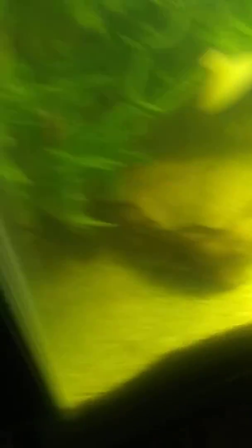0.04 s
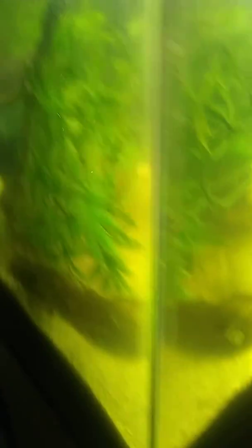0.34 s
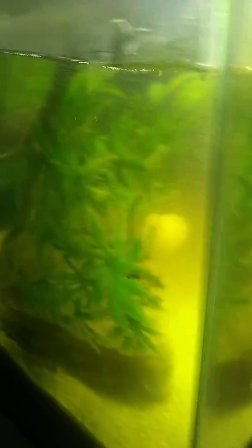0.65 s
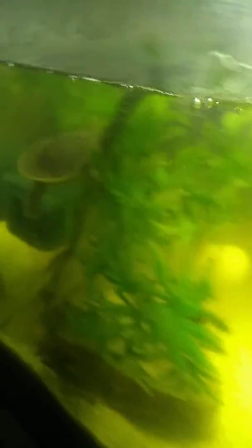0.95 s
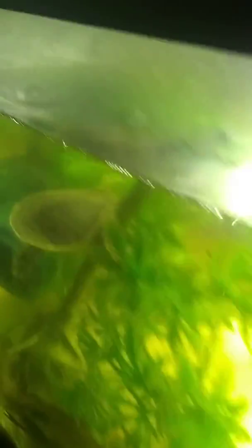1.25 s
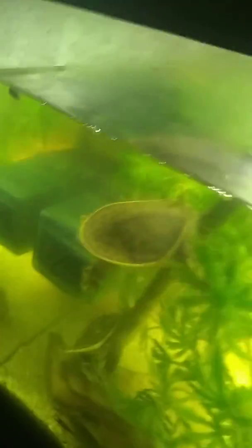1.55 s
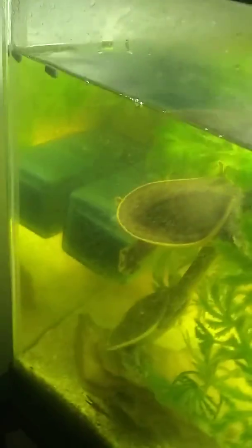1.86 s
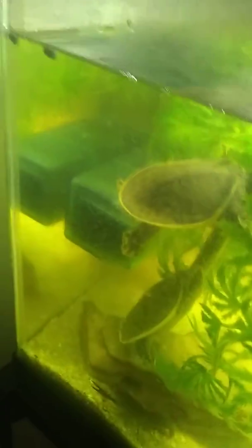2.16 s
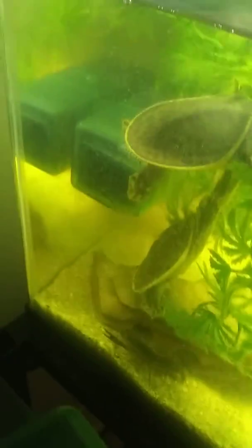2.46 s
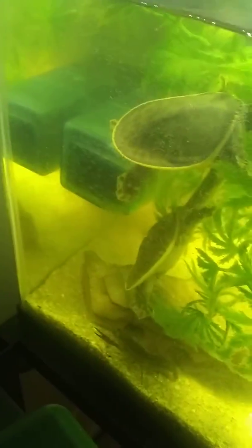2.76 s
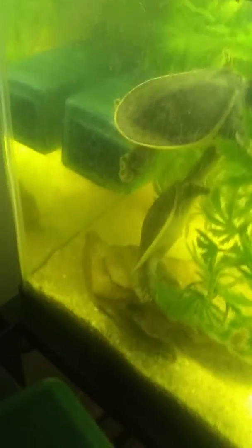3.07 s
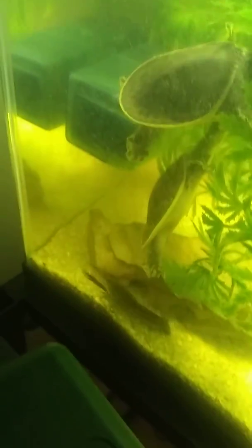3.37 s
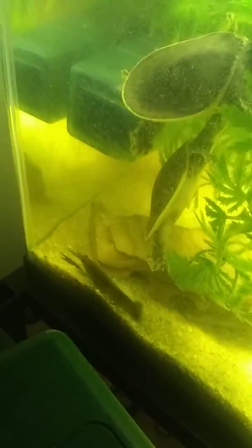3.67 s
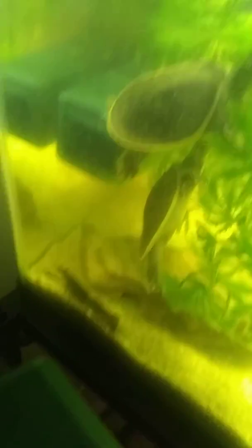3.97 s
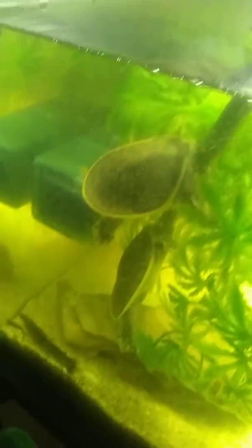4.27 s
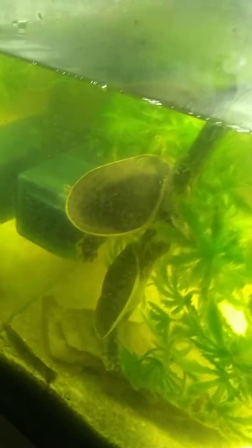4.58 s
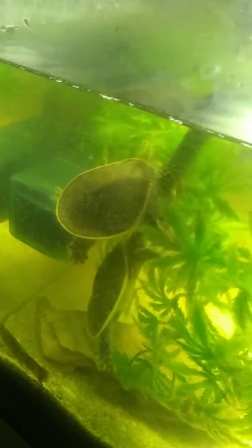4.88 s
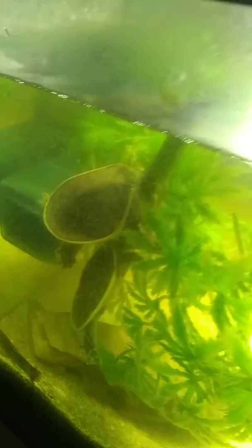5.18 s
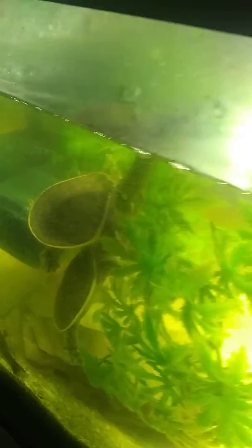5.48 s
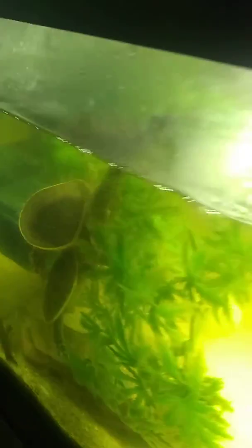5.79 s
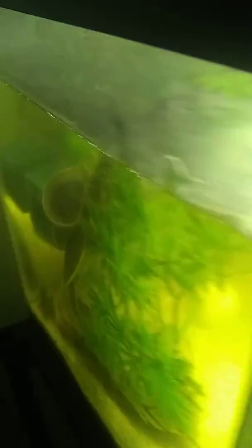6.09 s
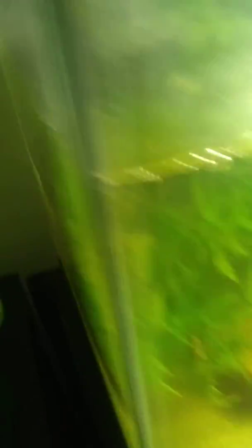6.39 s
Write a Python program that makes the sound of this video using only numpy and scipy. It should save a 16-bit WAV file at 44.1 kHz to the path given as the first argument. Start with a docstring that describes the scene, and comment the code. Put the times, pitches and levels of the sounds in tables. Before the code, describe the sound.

Water trickles and plinks from an aquarium filter over a low steady pump hum, with brief handling rustle and bumps at first.

```python
"""A pump hums in a small room and a sleeve rustles, while an aquarium filter trickles into its tank.
Each splash traps a bubble that resonates briefly under the lid; spray ticks and fizzes above a soft,
surging rush, and air gulps in the filter's housing. The rustle comes from a hand-held camera with two
cross-fed microphone ports, which swings round the corner of the tank and is bumped a few times."""
import sys
import numpy as np
from scipy import signal
from scipy.fft import rfft, irfft
from scipy.io import wavfile

SR = 44100
rng = np.random.default_rng(int(sys.argv[2]) if len(sys.argv) > 2 else 0)


def store_pcm(level_fs):
    """Save levels as 16-bit WAV."""
    pcm = np.round(np.clip(level_fs, -1, 1) * 32767).astype(np.int16)
    wavfile.write(sys.argv[1], SR, np.atleast_2d(pcm).T)


N = 283946
TIME, FREQ = np.arange(N) / SR, np.fft.rfftfreq(N, 1 / SR)


def gain_of(db):
    """Amplitude ratio of a level in decibels."""
    return 10 ** (np.asarray(db) / 20)


def unit_rms(x):
    """Normalisation to a mean power of 1."""
    return x / np.sqrt(np.mean(x ** 2) + 1e-20)


def value_at(points, hz):
    """Interpolation of (frequency, value) points on a logarithmic frequency axis."""
    point_hz, value = np.transpose(points)
    return np.interp(np.log(hz + 1), np.log(point_hz + 1), value)


def envelope(curve):
    """Amplitude envelope through (time_s, level_db) points."""
    return gain_of(np.interp(TIME, *np.transpose(curve)))


def coloured(x, db):
    """Spectral shaping by a gain in dB at every frequency, scaled to rms 1."""
    return unit_rms(irfft(rfft(x) * gain_of(db), N))


def wander(corner_hz):
    """Random fluctuation of rms 1, falling 12 dB an octave above the corner."""
    return coloured(rng.standard_normal(N), -40 * np.log10(1 + FREQ / corner_hz))


def add(mix, start_s, sound):
    """Superposition of a sound on both channels of the mix."""
    part = mix[:, max(round(start_s * SR), 0):][:, :sound.shape[1]]
    part += sound[:, :part.shape[1]]


def scatter(sound, glass=1.3, fade_s=0.0095, left_lag_samples=14):
    """Direct sound and early reflections off the glass, scaled to the energy of 10 ms at rms 1."""
    t = np.arange(1500) / SR
    taps = rng.standard_normal((2, len(t))) * (rng.random((2, len(t))) < .08) * np.exp(-t / fade_s)
    taps *= glass / np.linalg.norm(taps, axis=1, keepdims=True)
    taps[0, left_lag_samples] += 1
    taps[1, 0] += 1
    out = signal.fftconvolve(sound[None], taps, axes=1)
    return out / np.sqrt((out ** 2).mean(0).sum() / (SR / 100))


def room(x, wet_db):
    """Reverberation: a diffuse tail, longest in the bass and different for every source position."""
    # reverberation time of the room: frequency_hz, t60_s
    decay_times = [(300, 1), (1500, 0.2), (4000, 0.22), (8000, 0.14), (14000, 0.29)]
    hz, t, spectra = signal.stft(rng.standard_normal((2, SR // 3)), SR, nperseg=256)
    spectra = spectra * gain_of(-60 * t / value_at(decay_times, hz)[:, None]) * np.minimum(t / 0.0016, 1)
    response = signal.istft(spectra, SR, nperseg=256)[1]
    response *= gain_of(wet_db) / np.linalg.norm(response[0])
    response[:, 0] += 1  # the direct sound
    return signal.oaconvolve(x, response, axes=1)[:, :N]


def diffuse_noise(colour):
    """A diffuse field: steady noise that is only partly coherent between the two ports."""
    # how much the ports differ: frequency_hz, side_over_mid_db
    widths = [(30, 8), (60, 4.5), (100, 0.5), (135, -11), (165, -7.5), (200, 1.5), (240, -5.5), (320, -2.5),
              (500, -6.5), (800, -5), (1150, -96), (2300, 24), (3400, -36), (4600, 52), (5700, -1)]
    mid, side = rfft(rng.standard_normal((2, N)))
    width = gain_of(value_at(widths, FREQ))
    pair = np.array([mid + width * side, mid - width * side]) / np.sqrt(1 + width ** 2)
    return coloured(irfft(pair, N), value_at(colour, FREQ))


def pump(waver_rad=0.39):
    """Pump hum, with two faint wavering resonances above it, over the rumble of churned water."""
    # spectrum of the rumble in the housing: frequency_hz, density_db
    colour = [(22, -33), (33, -16), (55, -9), (75, -11.5), (112, -13.5), (135, -2.5), (163, 1), (190, -3.5),
              (206, -9.5), (219, -3.5), (246, -10), (263, -3), (281, -10.5), (450, -24.5), (900, -52)]
    # pump hum and, in the last two rows, the resonances: pitch_hz, rms_db, port_phase_rad
    hum_and_resonances = [(100, -67.5, 1.5), (120, -57.3, 2.2), (161.5, -57, .5), (179, -62, .5),
                          (240, -61, 1.0), (300, -70, .5), (360, -70, .5), (546, -70.5, .5), (636, -72, .4),
                          (840, -76, .2)]
    out = gain_of(-47.5) * diffuse_noise(colour) * gain_of([[.8], [-.8]])
    for hz, db, port_phase in hum_and_resonances:
        phase = 2 * np.pi * hz * TIME + waver_rad * wander(corner_hz=0.61)
        out += np.sqrt(2) * gain_of(db) * np.sin(phase + np.array([[port_phase], [0]]))
    return out


def room_air(level_db=-52.5):
    """Ambient noise: a faint, low, diffuse background."""
    # spectrum of the background: frequency_hz, density_db
    colour = [(100, -19), (250, -2.5), (380, 3), (415, -4), (490, -0.5), (610, -5.5), (645, -1), (720, -7),
              (870, -9), (1000, -24), (1500, -29), (4000, -42)]
    return gain_of(level_db) * diffuse_noise(colour)


def rustle(slip_db=0.5, drag_db=1.87):
    """Friction noise: cloth and skin slide unevenly near the ports, in fine slips and longer drags."""
    # rubbing of sleeve and hand as the camera swings round: time_s, level_db
    levels = [(0, -47), (.22, -43), (.45, -47), (.62, -41.5), (.8, -51), (.9, -52), (1.05, -64),
              (1.3, -100)]
    # spectrum of the rubbing: frequency_hz, density_db
    colour = [(70, -20), (170, -10), (390, 9), (600, -6), (1000, -6.5), (2100, -3.5), (2400, -0.5),
              (2900, -14), (3450, 2), (3950, -5), (4600, -17), (5800, -7.5), (6900, -25), (7800, -7.5),
              (8700, -22.5), (10300, -3), (11200, -18), (12400, -4.5), (14000, -25)]
    unevenness = gain_of(slip_db * wander(corner_hz=90) + drag_db * wander(corner_hz=14))
    return envelope(levels) * unevenness * diffuse_noise(colour)


def bubble(hz, cycles, glide, burst_hz=4500, samples=1800):
    """A damped oscillator whose pitch climbs as it nears the surface; above burst_hz it bursts early."""
    t = np.arange(samples) / SR
    decay_s = cycles / hz * (hz / 3000) ** 0.26 / np.sqrt(1 + (hz / burst_hz) ** 6)
    decay = np.exp(-t / decay_s)
    attack = 1 - np.exp(-t / (0.091 * decay_s))
    turns = hz * (t + glide * (t - decay_s * (1 - decay))) / (1 + glide / 2)
    return np.sin(2 * np.pi * turns) * decay * attack


def swarm(per_s, spread_db, low_hz, high_hz, cycles, spots, wet_db=3.5):
    """Incoherent sum of small bubbles of random moment, pitch and strength at several surface spots."""
    out, impulse = np.zeros((2, N)), np.ones(1)
    per_spot = int(per_s * N / SR / spots)
    for _ in range(spots):
        bubbles = np.zeros((1, N))
        for moment, pitch, strength in rng.random((3000, 4))[:per_spot, :3]:
            hz = low_hz + (high_hz - low_hz) * pitch ** 1.5  # low bubbles are the more common
            amplitude = gain_of(spread_db * min(-np.log(1 - strength), 3)) * (hz / high_hz) ** 0.82
            ring = bubble(hz, cycles, glide=0.014, burst_hz=8100, samples=400)
            add(bubbles, moment * N / SR, amplitude * ring[None])
        out += room(signal.oaconvolve(bubbles, scatter(impulse), axes=1)[:, :N], wet_db)
    return out


def stream():
    """The falling sheet of water: heavily damped splashes overlap into a broadband rush."""
    # course of the rush: time_s, relative_db
    levels = [(0, -56), (.5, -58), (.63, -53), (.85, -56), (1.08, -63), (1.3, -51.5), (1.62, -52),
              (1.85, -62), (3.75, -62), (4.0, -55), (4.48, -62), (5.5, -62), (5.85, -58), (6.44, -58.5)]
    # shaping of its spectrum: frequency_hz, gain_db
    colour = [(300, 15.5), (700, -7), (1000, 6), (1500, 5), (2200, 4.5), (2700, 6), (3400, 3.5),
              (4600, -20), (7000, 4), (10300, -1.5), (12000, -2.5), (14000, 1)]
    splashes = swarm(per_s=1500, spread_db=3.5, low_hz=487, high_hz=14000, cycles=2.72, spots=6)
    return gain_of(7.0) * envelope(levels) * coloured(splashes, value_at(colour, FREQ))


def froth():
    """Tiny bubbles resonate and burst where the stream enters, merging into a fizz."""
    # course of the fizz: time_s, relative_db
    levels = [(0, -66), (.65, -52), (.85, -54.5), (1.05, -57.5), (1.3, -55.5), (1.65, -53.5), (2.1, -56.5),
              (2.7, -55.5), (3.6, -56.5), (3.95, -60), (4.3, -55.5), (5.7, -55), (6.44, -59.5)]
    # shaping of its spectrum: frequency_hz, gain_db
    colour = [(900, 17), (1500, -15), (2200, -48), (3200, 2), (4200, 5), (4900, 3.5), (6000, 3),
              (8000, 2.5), (10300, 4), (11500, -1), (14000, 6.5)]
    bubbles = swarm(per_s=750, spread_db=7.0, low_hz=1332, high_hz=14110, cycles=7.1, spots=10)
    return gain_of(4.0) * envelope(levels) * coloured(bubbles, value_at(colour, FREQ))


def surge(corner_hz=4.9, depth_db=1.45):
    """Amplitude modulation: the flow from the outlet swells and sinks at random."""
    flow = coloured(rng.standard_normal(N), -10 * np.log10(1 + (FREQ / corner_hz) ** 4))
    return gain_of(depth_db * flow)


def by_chance(per_s, low_hz, high_hz, mean_db, spread_db=2.5):
    """Jittered events, shed at a steady rate but uneven moments: start_s, pitch_hz, relative_db."""
    events = []
    for slot, (moment, pitch, strength) in enumerate(rng.random((400, 3))):
        start_s = (slot + moment) / per_s
        hz = low_hz * (high_hz / low_hz) ** pitch
        db = mean_db + spread_db * np.sqrt(3) * (2 * strength - 1)
        if start_s < N / SR:
            events.append((start_s, hz, db))
    return events


def slap(hz, decay_s, patter_s=0.015, fragments_db=-4, top_hz=10700):
    """Impact noise: a drop hits the surface with a band-limited tick, and its fragments patter after."""
    t = np.arange(1600) / SR
    tick = rng.standard_normal(len(t)) * np.exp(-t / decay_s)
    fragments = rng.standard_normal(len(t)) * (rng.random(len(t)) < .03) * np.exp(-t / patter_s)
    impact = unit_rms(tick) + gain_of(fragments_db) * unit_rms(fragments)
    upper_hz = max(min(hz * 1.7, top_hz), hz)
    band = signal.butter(3, [hz * 0.79, upper_hz], "band", fs=SR, output="sos")
    return scatter(signal.sosfilt(band, impact), glass=1.0)


def plinks(splash_db=-9.5, satellite_db=-12):
    """Bubble resonance: a splash traps air, which rings and pinches off two smaller, higher bubbles."""
    # big air bubbles that stand out of the trickle: start_s, pitch_hz, relative_db
    big_bubbles = [(0.771, 1420, -46.5), (1.096, 2610, -42), (1.16, 2490, -39.5), (1.1623, 4060, -44),
                   (1.41, 3520, -43), (1.352, 2810, -42), (1.471, 2010, -38), (1.529, 2170, -42),
                   (1.588, 1434, -46.5), (1.651, 6340, -44), (1.743, 3880, -45.5), (1.753, 1520, -40),
                   (1.843, 4980, -39.5), (2.107, 2620, -40), (2.142, 4530, -43.5), (2.174, 3440, -50.5),
                   (2.2322, 2895, -43), (2.25, 2750, -40), (2.278, 2370, -44), (2.355, 3900, -46),
                   (2.428, 1790, -43), (2.629, 2460, -42), (2.687, 2320, -41.5), (2.817, 2150, -38),
                   (2.827, 3350, -47), (2.944, 2140, -38), (3.04, 4240, -44), (3.051, 1700, -50.5),
                   (3.056, 3030, -45.5), (3.09, 3970, -41.5), (3.237, 4130, -50), (3.368, 2100, -39),
                   (3.438, 3580, -45.5), (3.475, 4090, -46), (3.506, 1880, -48.5), (3.536, 4500, -47),
                   (3.612, 1410, -47.5), (3.656, 4280, -46), (3.722, 1900, -49.5), (3.744, 2210, -41),
                   (3.763, 2300, -37.5), (3.916, 3530, -48.5), (3.936, 2320, -38), (4.033, 4420, -37.5),
                   (4.07, 1815, -46.5), (4.146, 3940, -45), (4.224, 5500, -45), (4.296, 1500, -37.5),
                   (4.306, 2130, -46), (4.306, 3020, -48), (4.35, 4460, -39.5), (4.4163, 5740, -50),
                   (4.519, 3270, -43), (4.59, 3210, -46.5), (4.711, 4180, -40.5), (4.757, 3200, -38),
                   (4.819, 2890, -42.5), (4.897, 2140, -35.5), (4.942, 2990, -38), (5.016, 4250, -39.5),
                   (5.259, 4920, -41), (5.33, 2230, -46.5), (5.41, 3840, -48), (5.463, 5000, -42),
                   (5.537, 1864, -46.5), (5.541, 4970, -44.5), (5.583, 3650, -44), (5.59, 2140, -50),
                   (5.635, 3040, -44), (5.73, 3200, -47), (5.784, 1850, -50.5), (5.843, 2040, -42),
                   (5.939, 3050, -40), (5.978, 1543, -48), (6.006, 2975, -47), (6.03, 5240, -44),
                   (6.082, 1610, -47), (6.143, 5080, -46), (6.158, 3030, -47.5), (6.335, 4080, -44.5)]
    gurgle = by_chance(per_s=22, low_hz=2750, high_hz=6200, mean_db=-56)  # lesser bubbles
    churn = by_chance(per_s=14, low_hz=1714, high_hz=2870, mean_db=-57.5)  # break-up in churned water
    out = np.zeros((2, N))
    for start_s, hz, db in big_bubbles + gurgle + churn:
        depth = rng.random()  # a deeper bubble rings longer and glides less
        cycles = 11 * np.exp(0.37 * (2 * depth - 1))
        glide = 0.04 * (1 - depth)
        add(out, start_s, gain_of(db + splash_db) * slap(hz * 1.55, decay_s=0.004))
        add(out, start_s, gain_of(db) * scatter(bubble(hz, cycles, glide), glass=1.52))
        for late, smaller in rng.random((2, 2)):
            satellite = bubble(hz * (1 + 0.356 * smaller), cycles, glide)
            add(out, start_s + 0.0032 + .018 * late, gain_of(db + satellite_db) * scatter(satellite))
    return gain_of(-4.0) * room(out, wet_db=-1.0)


def spray(tick_s=0.0024, bright_hz=7900):
    """Impacts that trap no air: a tick's decay time varies inversely with its frequency."""
    # the hardest drops that slap the surface: start_s, pitch_hz, relative_db
    hard_drops = [(0.8832, 5970, -37.5), (1.18, 4460, -36), (1.2912, 8160, -40), (1.303, 9600, -33),
                  (1.3557, 5950, -35), (1.393, 5840, -36), (1.505, 9700, -35), (1.681, 6470, -45),
                  (1.799, 8400, -34), (2.072, 10100, -37.5), (2.197, 5540, -48), (2.314, 9300, -37.5),
                  (2.469, 6500, -40.5), (2.5434, 5640, -40.5), (2.685, 4600, -45.5), (2.715, 9900, -35),
                  (2.84, 9000, -41.5), (3.029, 5450, -36), (3.134, 4830, -36.5), (3.8722, 5850, -35),
                  (4.0328, 5200, -31.5), (4.1076, 5600, -36.5), (4.239, 8700, -43), (4.3854, 8600, -41),
                  (4.675, 8900, -42), (4.7563, 5330, -39), (4.818, 6000, -40), (4.962, 8300, -37),
                  (5.0143, 5930, -33), (5.162, 5940, -38.5), (5.4037, 7750, -40.5), (5.566, 7000, -38.5),
                  (5.7167, 7500, -40), (5.829, 10500, -40), (6.2655, 6200, -39.5), (6.302, 11200, -38.5)]
    light_drops = by_chance(per_s=55, low_hz=3440, high_hz=bright_hz, mean_db=-51)
    out = np.zeros((2, N))
    for start_s, hz, db in hard_drops + light_drops:
        add(out, start_s, gain_of(db) * slap(hz, decay_s=tick_s * bright_hz / hz))
    return gain_of(-7.8) * room(out, wet_db=0.3)


def lid(x):
    """Cavity resonance: the air under the lid rings on after whatever sounds in the tank."""
    # resonances of the air space and the gaps between them: centre_hz, width_hz, boost_db
    resonances = [(1459, 22, 8), (1510, 60, 2), (1800, 45, 6), (2124, 50, 4), (2310, 90, -4), (2425, 35, 3),
                  (2710, 100, -6), (2815, 40, 4), (3015, 28, 10), (3100, 70, -3), (3262, 50, 5),
                  (3440, 35, 3), (3540, 50, 4), (3700, 70, -5), (3920, 80, 3), (4130, 90, 3)]
    boost_db = sum(db / (1 + (2 * (FREQ - hz) / width) ** 2) for hz, width, db in resonances)
    log_gain = np.log(gain_of(boost_db))
    mirrored = np.r_[log_gain, log_gain[-2:0:-1]]
    minimum_phase = np.exp(np.conj(signal.hilbert(mirrored)))[:len(FREQ)]  # ringing follows its cause
    return irfft(rfft(x) * minimum_phase, N)


def ports(x, delay_s=19 / SR):
    """Comb filtering: each port loses a delayed copy of the other, notching mid and side in turn."""
    # cross-feed between the ports: frequency_hz, share
    crossfeed = [(300, 0.22), (700, 0.21), (1100, 1), (2400, 0.84), (4600, 0.47), (6500, 0.34), (9000, 0.2),
                 (14000, 0.02)]
    # the camera's leaning toward one port: frequency_hz, left_minus_right_db
    lean = [(1200, 7), (2000, -1), (3200, -2.5), (4600, -6), (6500, -4), (8500, 0.5), (12000, -0.5)]
    share = value_at(crossfeed, FREQ)
    own = rfft(x) * gain_of(np.outer([.5, -.5], value_at(lean, FREQ)))
    crossed = share * np.exp(-2j * np.pi * FREQ * delay_s) * own[::-1]
    return irfft((own - crossed) / np.sqrt(1 + share ** 2), N)


def knock():
    """Modal ringing: a finger strikes the camera's hollow case, heard alike at both ports."""
    # the knock and its rebound: start_s, level_db
    strikes = [(0.235, -32.5), (0.2532, -38)]
    # modes of the case: pitch_hz, relative_db, decay_s
    modes = [(420, -1, 0.012), (850, -10, 0.01), (1200, -13, 0.0069)]
    out, t = np.zeros((2, N)), np.arange(SR // 5) / SR
    ring = sum(gain_of(db) * np.sin(2 * np.pi * hz * t) * np.exp(-t / decay) for hz, db, decay in modes)
    for start_s, db in strikes:
        add(out, start_s, gain_of(db) * ring[None])
    return out


def handling(overtone_ratio=1.82, overtone_db=-6, rise_s=0.0038):
    """Structure-borne sound: dull bumps shake the camera and push its two ports in opposite phase."""
    # bumps of the hand: start_s, level_db, pitch_hz, decay_s, right_port_gain
    bumps = [(0.596, -33, 60, 0.028, -1.1), (.812, -24, 56.4, 0.043, -0.79), (.945, -39, 60, 0.043, -0.77),
             (1.9, -37, 55, .02, -0.6)]
    out, t = np.zeros((2, N)), np.arange(SR // 3) / SR
    for start_s, db, hz, decay_s, right_gain in bumps:
        phase = 2 * np.pi * hz * t
        sway = np.sin(phase) + gain_of(overtone_db) * np.sin(overtone_ratio * phase)
        thud = sway * np.exp(-t / decay_s) * (1 - np.exp(-t / rise_s))
        add(out, start_s, gain_of(db) * np.outer([1, right_gain], thud))
    return out


def snap(decay_s=.0012, low_hz=9500):
    """Impact on a rigid surface: the brief contact of a drop on glass gives a very bright crack."""
    # a drop flung against the lid: start_s, relative_db
    hits = [(1.7786, -29.5)]
    out, t = np.zeros((2, N)), np.arange(600) / SR
    highpass = signal.butter(3, low_hz, "high", fs=SR, output="sos")
    for start_s, db in hits:
        crack = signal.sosfilt(highpass, rng.standard_normal(len(t)) * np.exp(-t / decay_s))
        add(out, start_s, gain_of(db) * scatter(crack, glass=0.79))
    return gain_of(-6) * room(out, wet_db=-2)


def gulps(rise_s=0.0066, decay_s=0.017, glide=0.034, port_phase_rad=0.92):
    """Damped oscillation: each gulp of air past the impeller throbs a few cycles, rising slightly."""
    # gulps of air in the filter's housing: start_s, pitch_hz, peak_db
    air_pockets = [(2.003, 230, -40), (3.025, 137, -41), (3.2, 249, -42), (3.408, 244, -41.5),
                   (3.785, 155, -40), (3.845, 253, -40.5), (4.045, 141, -39), (4.69, 247, -41.5),
                   (4.838, 138, -40.5), (4.875, 240, -42), (5.143, 243, -40)]
    out, t = np.zeros((2, N)), np.arange(SR // 5) / SR
    swell = (1 - np.exp(-t / rise_s)) ** 2 * np.exp(-t / decay_s)
    for start_s, hz, db in air_pockets:
        turns = hz * t * (1 + glide * np.tanh(t / decay_s) / 2) + rng.random()
        throb = np.sin(2 * np.pi * turns + np.array([[port_phase_rad], [0]]))
        add(out, start_s, gain_of(db) * swell / swell.max() * throb)
    return out


def scene():
    """Superposition of the water, filtered by lid and ports, with the pump, the room and the hand."""
    water = plinks() + spray() + snap() + surge() * (froth() + stream())
    return ports(lid(water)) + pump() + gulps() + room_air() + rustle() + handling() + knock()


def record(dry, treble_hz=12900, edge_hz=14300):
    """Low-pass filtering: the microphone's treble falls away, then a steep band limit follows."""
    dull = signal.sosfilt(signal.butter(6, treble_hz, fs=SR, output="sos"), dry)
    band_limit = signal.firwin(511, edge_hz, window=("kaiser", 9), fs=SR)
    return signal.oaconvolve(dull, band_limit[None], "same")


dry = scene()
out = record(dry)
store_pcm(out)
```